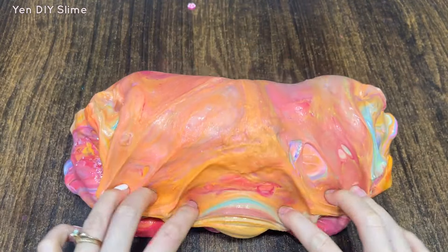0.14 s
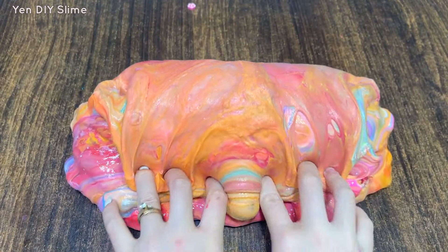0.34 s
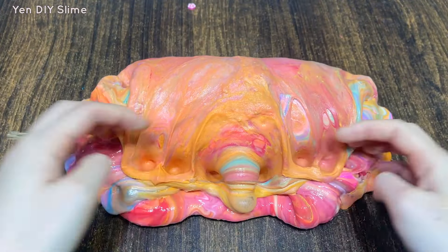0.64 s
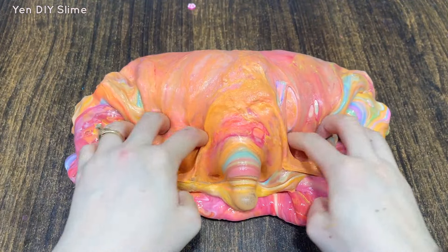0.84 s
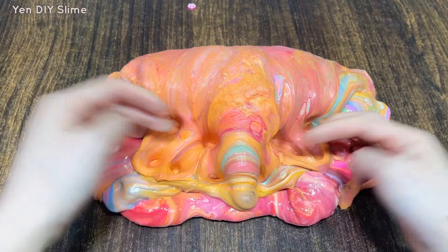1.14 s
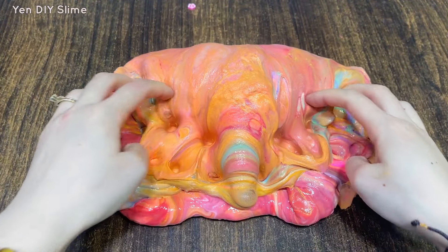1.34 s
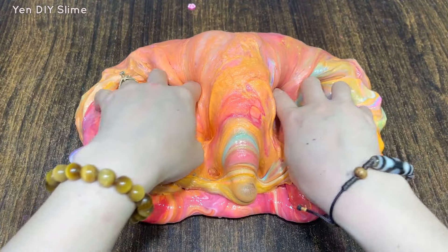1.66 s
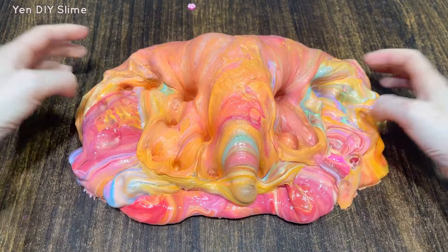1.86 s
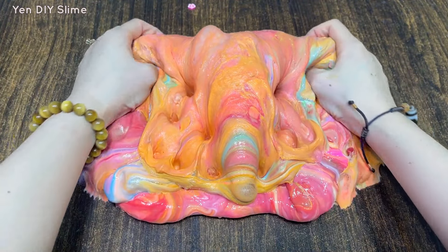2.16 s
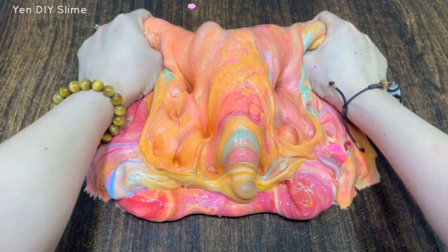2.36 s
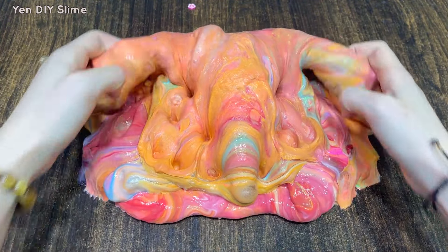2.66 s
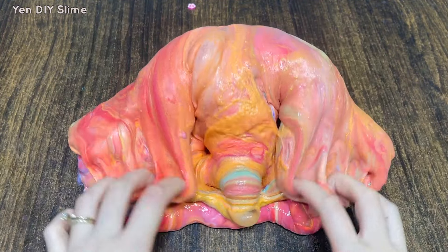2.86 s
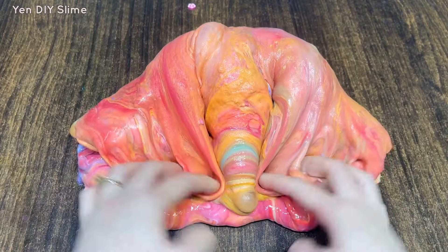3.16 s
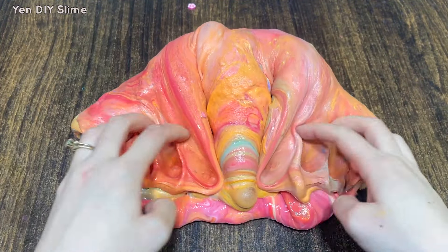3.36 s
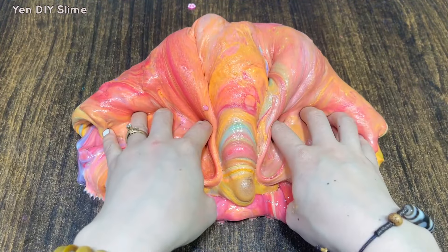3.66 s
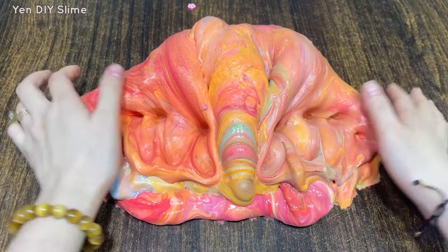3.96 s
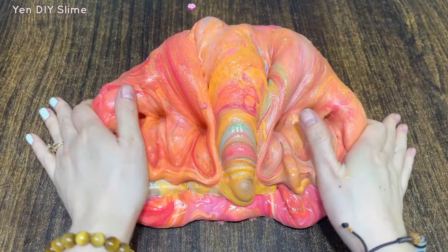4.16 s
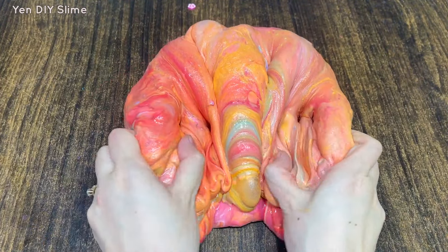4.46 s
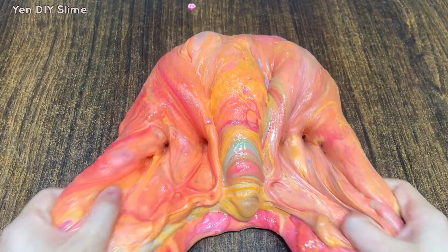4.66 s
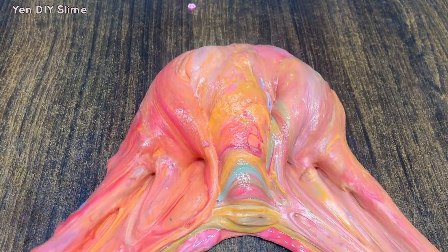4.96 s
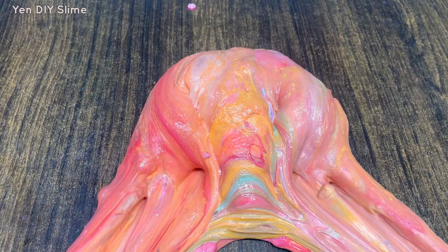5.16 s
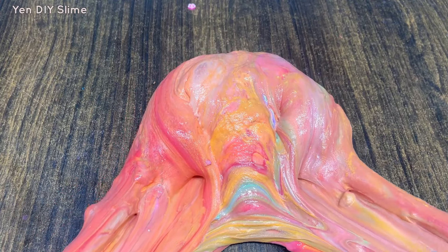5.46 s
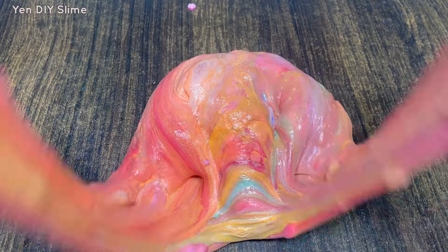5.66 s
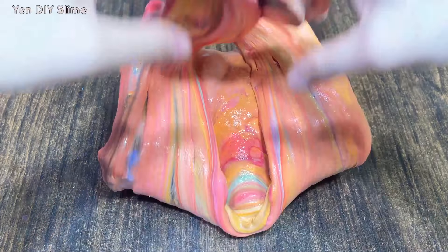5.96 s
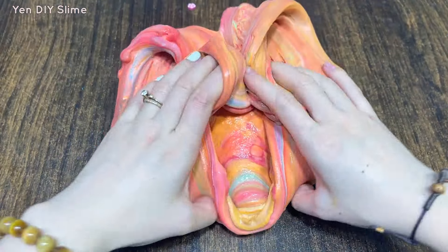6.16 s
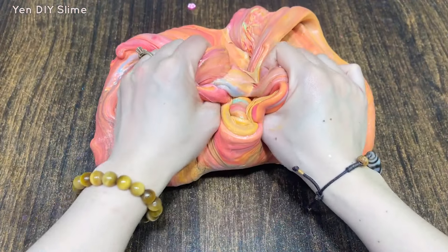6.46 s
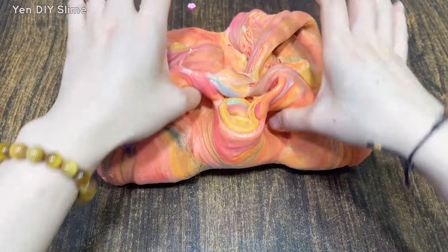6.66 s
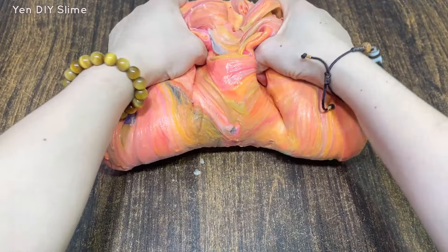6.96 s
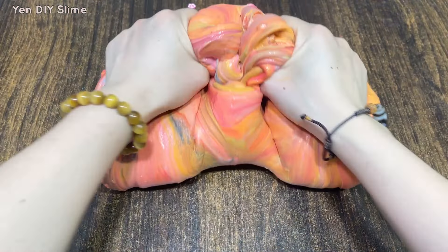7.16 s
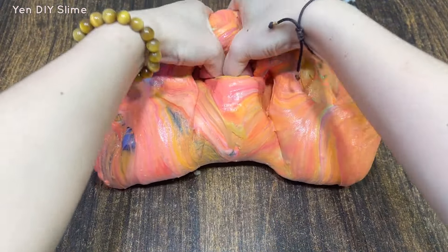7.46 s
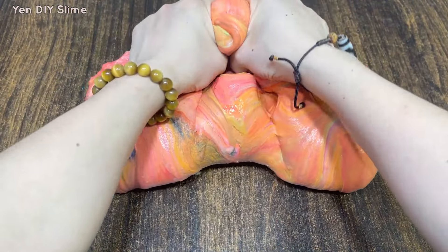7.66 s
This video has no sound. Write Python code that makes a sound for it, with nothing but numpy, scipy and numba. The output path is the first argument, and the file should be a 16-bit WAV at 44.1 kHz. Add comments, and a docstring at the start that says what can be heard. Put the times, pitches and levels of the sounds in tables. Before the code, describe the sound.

Hands knead glossy slime on a wooden table, with wet clicks, sharp sticky pops and crackling bursts over a faint hum.

```python
"""Sticky crackle over a faint appliance hum comes first, and at once wet pops: two hands knead glossy slime.
They press, fold and stretch it on a wooden table in a small room, close under a phone with two microphone ports.
Hand movements set the level of chirping air pockets (fading sines), tearing film (ticks) and table thuds (noise).
Single pops and squelches are rings at listed times; the hum is filtered noise with a wavering motor tone."""
import sys
import numpy as np
from scipy import signal
from scipy.fft import rfft, irfft, next_fast_len
from scipy.io import wavfile
from scipy.ndimage import uniform_filter1d
from numba import njit

SR = 44100
rng = np.random.default_rng(int(sys.argv[2]) if len(sys.argv) > 2 else 0)


def waveform_to_disk(signal):
    """Save audio, clipped to [-1, 1], as 16-bit WAV at the path in sys.argv[1]."""
    frames = np.transpose(np.atleast_2d(signal))
    scaled = np.clip(frames, -1, 1) * 32767
    samples = np.round(scaled).astype(np.int16)
    wavfile.write(sys.argv[1], SR, samples)


N = 344421  # length in samples


def undb(db):
    """Turn dB into a plain gain."""
    return 10 ** (np.asarray(db) / 20)


def unit(x):
    """Scale a sound to an average (RMS) level of 1."""
    return x / np.sqrt(np.mean(x ** 2))


def along(table, hz):
    """Value of a (Hz, value) table, straight on a log-frequency axis."""
    f, v = np.transpose(table)
    return np.interp(np.log(hz + 1), np.log(f + 1), v)


def colour(x, table):
    """Causal filter with the dB shape of a table, from the folded cepstrum."""
    size = 8192
    cepstrum = irfft(np.log(undb(along(table, np.fft.rfftfreq(size, 1 / SR)))))
    # folding the second half onto the first makes the filter respond as early as it can
    cepstrum[1:size // 2] *= 2
    cepstrum[size // 2 + 1:] = 0
    response = irfft(np.exp(rfft(cepstrum)))[None, :size // 2]
    return signal.fftconvolve(x, response, axes=1)[:, :N]


def walk(rate):
    """Random levels held 1 / rate s and slewed twice; spread near 1."""
    k = int(SR / rate)
    steps = np.repeat(rng.standard_normal(N // k + 1), k)
    return 1.3 * uniform_filter1d(uniform_filter1d(steps, k), k)[:N]


def sides(pan_db):
    """Left and right gains whose difference is pan_db."""
    return undb(np.array([pan_db, -pan_db]) / 2)


@njit
def rings(start, hz, t60, glide, gain, swell):
    """Each cavity swells over a part of a cycle, then rings as a fading sine whose pitch glides up or down."""
    out = np.zeros((2, N))
    for e in range(len(hz)):
        z, open_ = 1 + 0j, 0.
        turn = 2 * np.pi * hz[e] / SR  # angle per sample
        fade = np.exp(-np.log(1000) / (t60[e] * SR))  # 60 dB down after t60 seconds
        for i in range(start[e], min(N, start[e] + int(t60[e] * SR))):
            z *= fade * np.exp(1j * turn)
            turn *= 1 + glide * turn / (2 * np.pi)
            open_ += (1 - open_) * min(1., turn / (2 * np.pi * swell))
            out[0, i] += gain[0, e] * open_ * z.imag
            out[1, i] += gain[1, e] * open_ * z.imag
    return out


RISE_BEND, FALL_BEND = 1.55, 0.7  # power of the 20 dB rise and fall curves in time


def effort(s, rise, hold, fall):
    """Power of each movement: it swells to full, holds, then lets go with a long tail."""
    t = np.arange(0, N / SR + .002, .001)  # one value per millisecond
    before = np.maximum(s - t, 0) / rise
    after = np.maximum(t - s - hold, 0) / fall
    return undb(-40 * (before ** RISE_BEND + after ** FALL_BEND))  # power, so this is 20 dB


FILM_LEAD = 0.25  # the film tears ahead of the air by this share of the rise
TABLE_LAG = 0.14  # the table answers late by this share of the rise
# Levels with the hands still: small pockets, large pockets, film and table, each in dB.
REST_DB = (-80.5, -84, -76, -73)
# Hand movements, short presses and long pulls. Each row: time of full effort in seconds, rise, hold and fall
# in seconds, then the levels in dB of small pockets, large pockets, tearing film and table thud.
MOVEMENTS = [(0.012, 0.055, 0.037, 0.068, -58, -64, -52.5, -63.5),
             (0.088, 0.023, 0.0064, 0.096, -56.5, -58, -49, -59.5),
             (0.171, 0.031, 0.087, 0.34, -68, -72.5, -54, -67),
             (0.343, 0.029, 0.012, 0.066, -75, -59.5, -45.5, -62),
             (0.414, 0.025, 0.0017, 0.047, -49.5, -49, -49.5, -52),
             (0.571, 0.041, 0.024, 0.043, -35.5, -40, -31, -39.5),
             (1.149, 0.039, 0.032, 0.048, -36.5, -46, -33.5, -49.5),
             (1.79, 0.049, 0.019, 0.035, -33.5, -44.5, -31, -48.5),
             (1.926, 0.026, 0.0082, 0.065, -71, -85.5, -46, -77),
             (2.026, 0.051, 0.2, 0.12, -70.5, -76, -63.5, -68.5),
             (2.352, 0.05, 0.048, 0.19, -64.5, -72.5, -59, -75),
             (2.564, 0.024, .01, 0.16, -38.5, -52, -30.5, -62),
             (2.682, 0.17, 0.13, 0.2, -60, -58, -46.5, -67.5),
             (2.942, 0.02, 0.0071, 0.077, -73.5, -78, -50, -73),
             (3.197, 0.035, 0.022, 0.078, -43, -53.5, -38, -53),
             (3.204, 0.0094, 0.027, 0.038, -32, -38, -32.5, -42),
             (3.534, 0.052, 0.015, 0.1, -69.5, -69.5, -57.5, -63),
             (3.81, 0.037, 0.047, 0.058, -37, -45.5, -34, -50.5),
             (3.824, 0.0051, 0.012, 0.019, -18.5, -28, -14.5, -56),
             (3.92, 0.044, 0.027, 0.11, -56.5, -57, -48.5, -66.5),
             (4.111, 0.025, 0.038, 0.055, -57, -62.5, -55.5, -65.5),
             (4.184, 0.021, 0.029, 0.099, -51.5, -57.5, -48.5, -65),
             (4.253, 0.035, 0.039, 0.37, -51, -55.5, -43.5, -60.5),
             (4.434, 0.042, 0.0085, 0.12, -48.5, -50, -37, -72),
             (4.573, 0.031, 0.11, 0.28, -59, -64, -50, -66.5),
             (4.777, 0.15, 0.392, 0.068, -64.5, -70, -54, -76),
             (5.27, 0.052, 0.03, 0.0796, -67, -83.5, -62.5, -87),
             (5.746, 0.057, 0.053, 0.034, -42, -50, -39.5, -63),
             (5.879, 0.062, 0.223, 0.077, -70, -67.5, -60.5, -62),
             (6.18, 0.066, 0.08, 0.09, -65, -64, -61, -59),
             (6.316, 0.094, 0.077, 0.11, -53.5, -60, -47.5, -61.5),
             (6.605, 0.051, 0.025, 0.058, -38.5, -45, -35.5, -46.5),
             (6.716, .015, 0.013, 0.028, -57.5, -76, -52.5, -62),
             (6.797, 0.041, 0.042, 0.072, -51, -55, -42, -49),
             (6.92, 0.043, 0.27, .08, -65.5, -70.5, -58, -61),
             (7.207, 0.032, .02, 0.044, -40, -45, -31, -37),
             (7.245, 0.03, 0.0061, 0.089, -39.5, -38.5, -31, -39),
             (7.412, 0.033, 0.053, 0.77, -53.5, -65, -52, -64.5),
             (7.581, 0.011, 0.0072, 0.056, -41.5, -41, -28.5, -58),
             (7.685, 0.017, 0.0153, 0.047, -41.5, -53, -44.5, -52),
             (7.8, 0.034, .02, .05, -47.5, -61, -42, -58)]


def kneading():
    """Level in dB of small pockets, large pockets, film and table: all movements summed over the rest."""
    s, rise, hold, fall, *db = np.transpose(MOVEMENTS)[:, :, None]
    push = effort(s, rise, hold, fall)
    tear = effort(s - FILM_LEAD * rise, rise, hold + FILM_LEAD * rise, fall)
    load = effort(s + TABLE_LAG * rise, rise, hold, fall)
    levels = []
    for shape, peak_db, rest_db in zip((push, push, tear, load), db, REST_DB):
        power = np.sum(shape * undb(2 * peak_db), axis=0) + undb(2 * rest_db)
        level_db = 10 * np.log10(power)
        levels.append(np.interp(np.arange(N) / SR * 1000, np.arange(len(power)), level_db))
    return levels


# The tone of tearing film. Each row: frequency in Hz, relative noise level in dB per Hz.
FILM_TONE = [(2470, -21), (4200, -14.5), (6920, -13), (8110, -8.5), (9140, -4.5), (10100, 0.5), (11400, -3),
             (12400, -14.5), (13700, -31), (16300, -30)]


def film(per_s=10000.0, scatter_db=-5.0, patchy_db=2.5, clump_db=2.5, apart=0.6):
    """Threads of sticky film snap as one-sample ticks in clumps; the far hand reaches one port later."""
    u = rng.random((3, N))
    strength_db = np.minimum(-scatter_db * np.log(u[1]), 14.)
    ticks = (u[0] < per_s / SR) * undb(strength_db) * rng.choice([-1., 1.], N)
    ticks = ticks * undb(patchy_db * walk(150) + clump_db * walk(35))
    far = ticks * (u[2] < apart / 2)
    late_port = ticks - far + np.roll(far, 5)  # 5 samples later
    return unit(colour(np.array([ticks, late_port]), FILM_TONE))


def pockets(low_hz, high_hz, count, cycles, holes, hole_s=.035, hole_db=1.5, jitter=.07,
            scatter_db=1.0, spread_db=13.5, glide=0.0051, swell=0.67):
    """Air escapes through short-lived holes; each lets out a string of pockets near its own sliding pitch."""
    # pockets of one hole share its draws; x is how far along the hole's life each one sounds
    at, pitch, strength, place, slide = rng.random((holes, 5))[np.arange(count) % holes].T
    x, u, v = rng.random((count, 3)).T
    bend = 2 * u - 1 + 2 * (2 * slide - 1) * (2 * x - 1)
    hz = low_hz * (high_hz / low_hz) ** pitch * (1 + jitter * bend)
    pocket_db = np.minimum(-scatter_db * np.log(v), 12.)
    db = pocket_db + np.minimum(-hole_db * np.log(strength), 12.)
    gain = undb(db) * np.sqrt(hz * np.sin(np.pi * x)) * sides(spread_db * (2 * place - 1))
    start = (at * N + x * hole_s * SR).astype(np.int64)
    return unit(rings(start, hz, cycles / hz, glide, gain, swell))


# The tone of the wooden table. Each row: frequency in Hz, relative noise level in dB per Hz.
TABLE_TONE = [(53, -49.5), (90, -10.5), (290, 3.5), (502, -3.5), (642, 2), (800, -13), (1100, -70.5)]


def thud(db, deep_db=-10.5, deep_hz=83.6, late_s=0.02):
    """The table top rumbles in lumps under the pushing hands; its deepest sway comes late and lingers."""
    mid, side = rng.standard_normal((2, N)) * undb(2 * walk(30))  # 2 dB lumps
    noise = mid + side * np.array([[.33], [-.33]])
    band = signal.butter(2, (20, deep_hz), "bandpass", fs=SR, output="sos")
    deep = signal.sosfilt(band, noise)
    late = int(late_s * SR)
    sway = np.roll(uniform_filter1d(undb(db), late), late)
    rumble = undb(db) * unit(colour(noise, TABLE_TONE))
    return rumble + undb(deep_db) * sway * unit(deep)


MOTOR_HZ, MOTOR_DB, HISS_DB = 116.3, -68, -64  # mean pitch, tone level before it wavers, steady noise level
# The tone of the hum. Each row: frequency in Hz, relative noise level in dB per Hz.
HUM_TONE = [(40, -29), (130, -9), (257, -11), (403, -22), (485, 0), (620, -1.5), (1000, -33), (4730, -34),
            (6160, -13.5), (7420, -31), (8690, -32.5), (14000, -42.5)]
# The hum's 400-800 Hz part swells. Each row: time in seconds, level in dB before the flicker.
HUM_SWELL = [(0.0, -64.5), (4.613, -62), (4.869, -67.5), (5.8, -62.5), (5.93, -51.5), (7.81, -59.5)]
# The hum leans to one side. Each row: frequency in Hz, left minus right level in dB.
HUM_LEAN = [(1300, 1.6), (4400, 12.5), (8100, 14.5), (15000, 6)]


def hum(alike_hz=494.0, flicker_db=-2.5):
    """Appliance noise in room resonances, alike on both ports in the bass only, over a wavering motor tone."""
    hz = np.fft.rfftfreq(N, 1 / SR)
    mid, side = rfft(rng.standard_normal((2, N)))
    alike = .9 / (1 + hz / alike_hz)
    both = mid * np.sqrt(1 + alike) + np.array([[1], [-1]]) * side * np.sqrt(1 - alike)
    noise = unit(colour(irfft(both * sides(along(HUM_LEAN, hz)), N), HUM_TONE))
    band = signal.butter(2, (400, 800), "bandpass", fs=SR, output="sos")
    low = signal.sosfilt(band, noise)
    s, db = np.transpose(HUM_SWELL)
    db = np.interp(np.arange(N) / SR, s, db)
    swell = undb(db + flicker_db * walk(14))
    # the motor tone dips by half as many dB wherever the swell is below its mean
    motor_db = MOTOR_DB + np.minimum(db - db.mean(), 0) / 2 + 4.5 * walk(25)
    motor = np.sin(2 * np.pi * np.cumsum(MOTOR_HZ + 5 * walk(45)) / SR) * undb(motor_db)
    return low * swell + (noise - low) * undb(HISS_DB) + motor


# Single pops. Each row: start in seconds, relative peak of the pocket in dB, its pitch in Hz,
# relative peak of the skin's snap in dB.
POPS = [(0.023, -25, 4530, -50), (0.079, -15, 1294, -24), (0.0796, -20, 5300, -35),
        (0.245, -60.5, 4500, -34), (0.296, -64, 4840, -28.5), (0.4085, -16.5, 4800, -39.5),
        (0.4094, -16, 1360, -20), (0.704, -41.5, 3330, -46), (1.065, -43.5, 2530, -43.5),
        (1.1567, -7, 5150, -15), (1.337, -39.5, 2220, -30.5), (1.4461, -41, 3050, -43),
        (1.511, -34, 2880, -47), (1.5638, -56, 1380, -34.5), (1.793, -7, 4870, -22),
        (1.9194, -47, 2960, -14.5), (2.0387, -39, 2530, -37.5), (2.1475, -31.5, 1860, -36),
        (2.16, -65, 5000, -25.5), (2.561, -15, 4370, -14), (2.7619, -21.5, 4760, -30),
        (2.763, -26, 1470, -40.5), (2.9286, -29.5, 4770, -30), (2.943, -46, 3500, -30.5),
        (2.957, -48, 3500, -30), (3.056, -75, 3340, -34), (3.2042, -18, 2720, -40),
        (3.2524, -41.5, 4970, -18), (3.264, -38, 4040, -19), (3.318, -38, 4500, -33),
        (3.3963, -54, 4000, -35.5), (3.5319, -37, 2670, -30), (3.8229, -11.5, 2210, 0.5),
        (3.831, -5, 3580, 3), (3.9381, -41, 1550, -19.5), (4.4156, -20.5, 3560, -10),
        (4.4295, -44, 4690, -18), (4.445, -43, 4840, -11), (4.491, -38, 3620, -22),
        (4.522, -38.5, 1190, -29), (4.547, -33.5, 4070, -34), (4.5817, -37, 3900, -47.5),
        (4.6486, -28.5, 2800, -13.5), (4.672, -38, 4000, -38.5), (4.742, -48.5, 5000, -26.5),
        (4.927, -51.5, 6800, -31), (4.9427, -40, 3520, -26), (5.029, -36.5, 1700, -45),
        (5.087, -42.5, 3024, -29), (5.7242, -30.5, 2780, -18), (5.7765, -26, 1620, -24),
        (5.787, -23, 1260, -21), (5.998, -28, 1480, -31.5), (6.051, -41, 3200, -28),
        (6.2489, -33.5, 2860, -26.5), (6.3288, -24.5, 2420, -30), (6.341, -36, 2300, -29),
        (6.3958, -47, 3200, -34), (6.42, -40.5, 1900, -25), (6.9145, -39.5, 1550, -43),
        (6.9494, -43, 1700, -47), (7.053, -41, 1500, -39), (7.099, -55, 4970, -25.5),
        (7.191, -32.5, 2600, -26), (7.402, -33.5, 2900, -27.5), (7.424, -36, 3300, -35),
        (7.472, -38.5, 1690, -42), (7.49, -42, 3400, -44), (7.528, -32.5, 1560, -46),
        (7.556, -33, 1360, -29), (7.5818, -26, 1800, -11), (7.6801, -24, 1260, -41),
        (7.6804, -12.5, 3300, -29), (7.6807, -16, 5300, -40)]


def pops(cycles=8.93, overtone=2.0, overtone_db=-6.0, snap_s=0.00068, spread_db=2.0,
         knock_hz=446.0, knock_s=.012, knock_db=-20.0):
    """A pocket bursts: its short ring with an overtone, a dull knock of the table and a bright snap of the
    skin."""
    s, peak_db, hz, snap_db = np.transpose(POPS)
    noise = rng.standard_normal((len(s), 512))
    start, t60 = (s * SR).astype(np.int64), cycles / hz
    place = sides(spread_db * noise[:, 0])
    pocket = undb(peak_db) * place
    out = rings(start, hz, t60, 0.0029, pocket, 0.57)
    out += rings(start, np.minimum(overtone * hz, 7000), t60 / 2, .01, pocket * undb(overtone_db), 0.71)
    # the knock's pitch glides down
    out += rings(start, knock_hz + 0 * hz, knock_s + 0 * hz, -0.051, pocket * undb(knock_db), 0.7)
    # each snap is noise that swells for snap_s, then fades
    snaps, t = np.zeros((2, N + 512)), np.arange(512) / SR / snap_s
    for i, g, n in zip(start, (undb(snap_db) * place).T, noise):
        snaps[:, i:i + 512] += g[:, None] * n * t * np.exp(1 - t)
    norm = np.std(colour(rng.standard_normal((1, N)), FILM_TONE))  # level change made by the colouring
    return undb(3.5) * out + undb(-10.5) * colour(snaps[:, :N], FILM_TONE) / norm


# Air sucked through a hole or fold. Each row: start in seconds, length in seconds, middle pitch in Hz,
# relative level in dB.
SQUELCHES = [(0.034, .035, 730, -50), (0.523, 0.022, 5050, -46.5), (0.552, 0.04, 2274, -28),
             (0.586, .025, 2950, -36), (1.123, .068, 3000, -30.5), (1.165, .02, 4600, -34),
             (1.758, 0.063, 2870, -32), (2.151, 0.055, 1910, -59), (2.399, 0.032, 1900, -64),
             (2.787, 0.056, 1290, -54.5), (3.197, .013, 2970, -22.5), (3.208, .03, 2920, -29),
             (3.818, .014, 440, -22.5), (4.193, 0.12, 1600, -51.5), (4.3, .04, 2600, -51),
             (4.389, 0.027, 1440, -46.5), (5.715, 0.051, 2850, -47), (5.756, 0.051, 1640, -45),
             (6.173, 0.017, 2180, -51.5), (6.194, .04, 1113, -53.5), (6.196, 0.031, 237, -40),
             (6.604, 0.05, 1670, -41.5), (6.608, .04, 200, -42), (6.802, 0.054, 1770, -51),
             (7.189, 0.034, 2710, -35.5), (7.208, 0.065, 1940, -38), (7.575, 0.015, 1740, -32.5),
             (7.579, 0.012, 3260, -35.5)]


def squelches(count=64, cycles=33.0, sag_per_s=2.5, jitter=0.12, scatter_db=1.0, spread_db=11.0):
    """Each opening rings near one pitch, which falls as it deepens; the air flow builds up, then stops short."""
    s, length, hz, db = np.transpose(SQUELCHES)[:, :, None]
    x, u, v, w = rng.random((len(s), count, 4)).transpose(2, 0, 1)
    pitch = hz * np.exp(sag_per_s * length * (.5 - x)) * (1 + jitter * (2 * u - 1))
    flow = np.sin(np.pi * x ** 1.4) * undb(db + np.minimum(-scatter_db * np.log(v), 10.))
    # short rings and sparse bursts must each be stronger for the same loudness
    t60 = np.minimum(cycles / pitch, .025)
    size = 5 * flow * np.sqrt(length / (count * t60))
    gain = size * sides(spread_db * (2 * w - 1))
    start = ((s + length * x) * SR).astype(np.int64)
    return rings(start.ravel(), pitch.ravel(), t60.ravel(), 0.005, gain.reshape(2, -1), 0.89)


# Phase between the ports. Each row: frequency in Hz, radians that the left port leads.
PORT_LEAD = [(0, .1), (1000, .5), (2840, 1.3), (4310, .7), (7580, .8), (8700, -.4), (11500, -6),
             (16500, -6.3)]
# Level between the ports. Each row: frequency in Hz, left minus right level in dB.
PORT_LEAN = [(900, -2), (2400, 3), (4400, 4), (8100, .5)]


def ports(x):
    """The two ports hear a close source with their own level and phase."""
    size = next_fast_len(N + 4096)
    hz = np.fft.rfftfreq(size, 1 / SR)
    lead = np.exp(.5j * np.interp(hz, *np.transpose(PORT_LEAD)))
    heard = rfft(x, size) * sides(along(PORT_LEAN, hz)) * np.array([lead, 1 / lead])
    return irfft(heard, size)[:, :N]


def room(x, t60_s=.1, level_db=-14, gap_s=.002):
    """Short diffuse tail of table and walls, different at each port."""
    t = np.arange(int(.4 * SR)) / SR
    tail = rng.standard_normal((2, len(t))) * undb(-60 * t / t60_s) * (t > gap_s)
    tail /= np.sqrt(np.sum(tail ** 2, axis=1, keepdims=True))
    return undb(level_db) * signal.fftconvolve(x, tail, axes=1)[:, :N]


def scene():
    """Slime sounds reach the ports directly and through the room; table and hum are added."""
    small_db, large_db, film_db, thud_db = kneading()
    skin = undb(film_db) * film()
    clumps_db = 1.4 * walk(20)  # shared by both pocket sizes
    small_gain = undb(small_db + clumps_db + 1.4 * walk(45))
    small = small_gain * pockets(1960, 5360, count=14000, cycles=9.9, holes=2800)
    large_gain = undb(large_db + clumps_db + 1.5 * walk(40))
    large = large_gain * pockets(1020, 1890, count=6500, cycles=17.0, holes=1600)
    slime = small + large + skin + squelches() + pops()
    return ports(slime) + room(slime) + thud(thud_db) + hum()


def record(dry):
    """The phone rounds the loudest peaks and cuts the top above 16100 Hz."""
    rounded = .78 * np.tanh(dry / .78)
    top_cut = signal.ellip(12, .2, 95, 16100, fs=SR, output="sos")
    return signal.sosfilt(top_cut, rounded)


dry = scene()
out = record(dry)
waveform_to_disk(out)
```